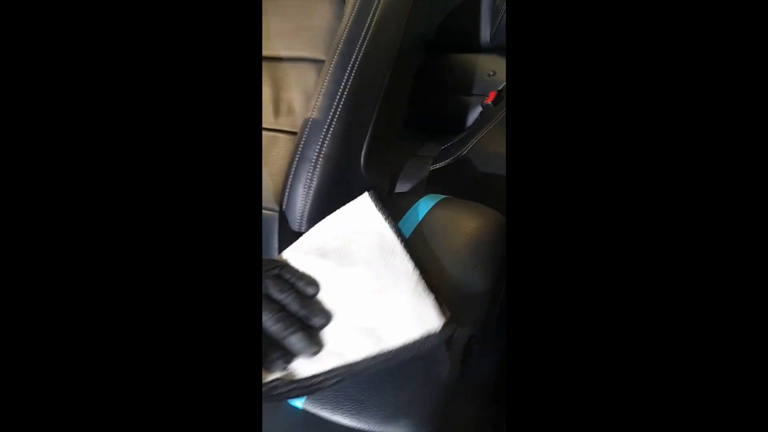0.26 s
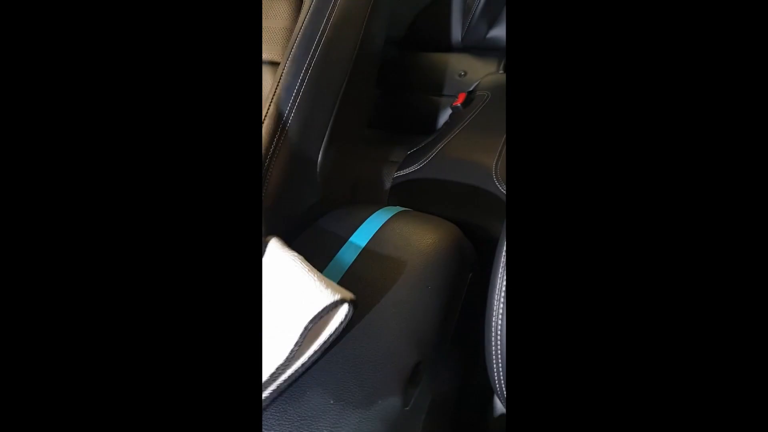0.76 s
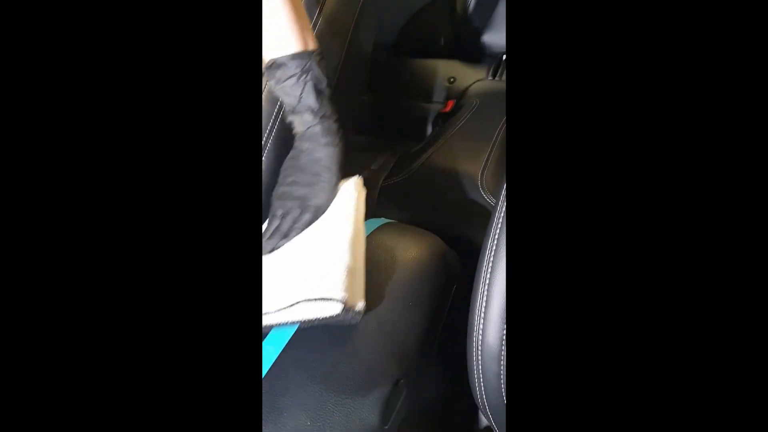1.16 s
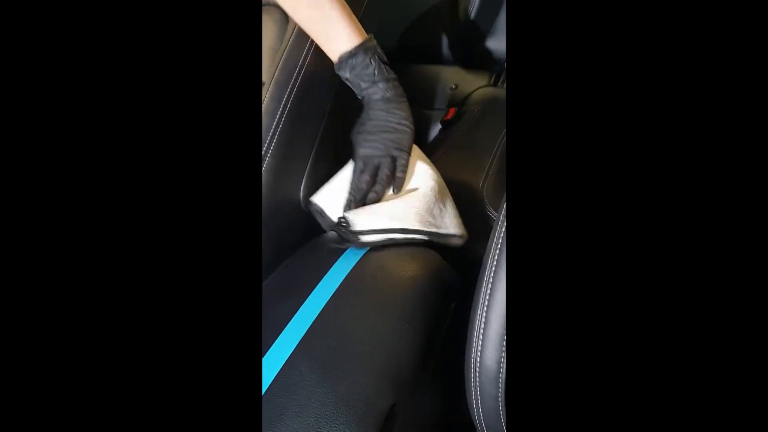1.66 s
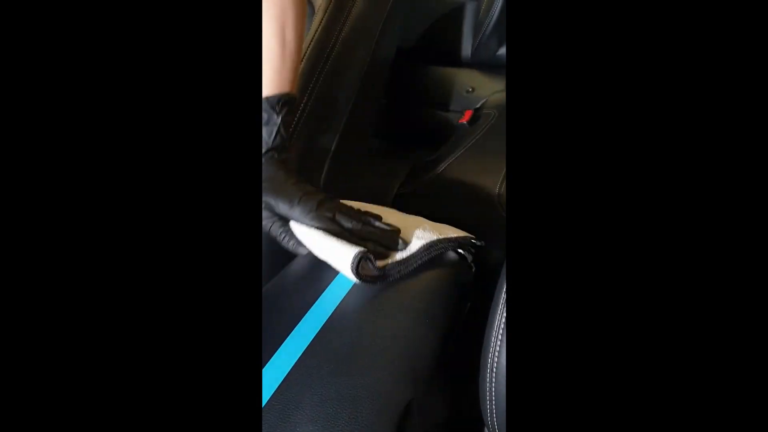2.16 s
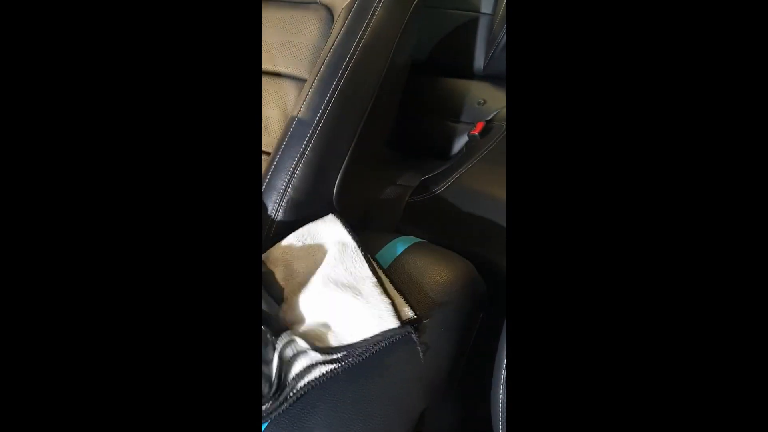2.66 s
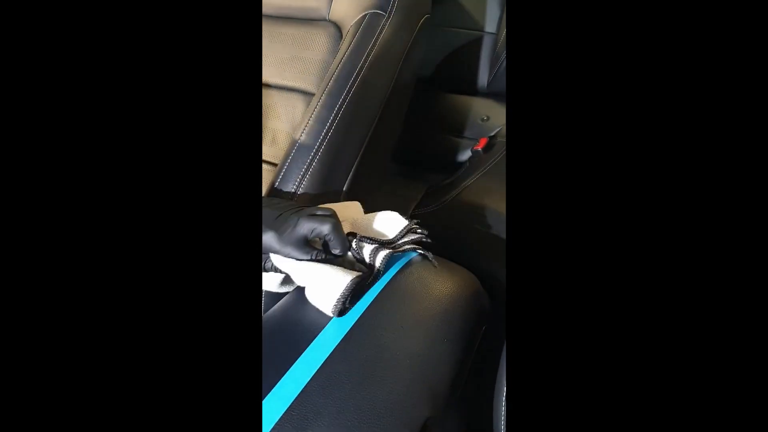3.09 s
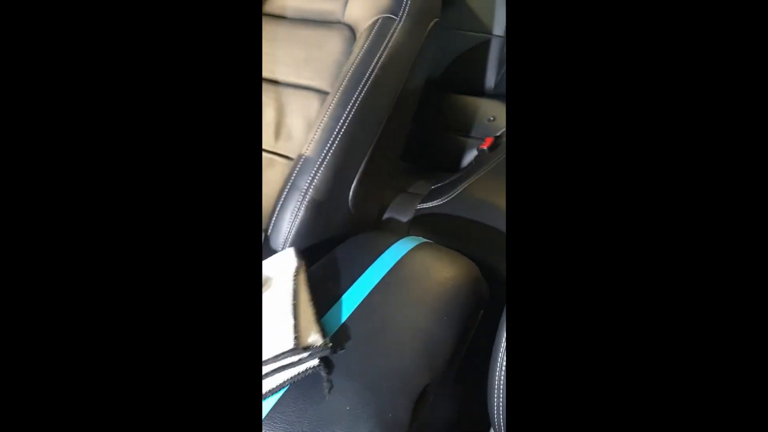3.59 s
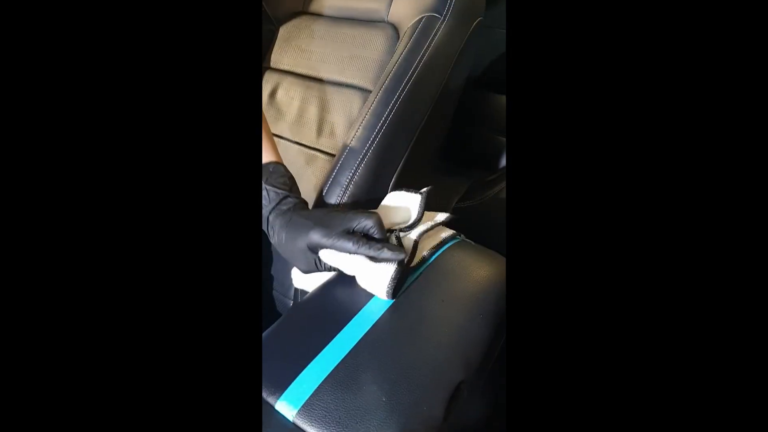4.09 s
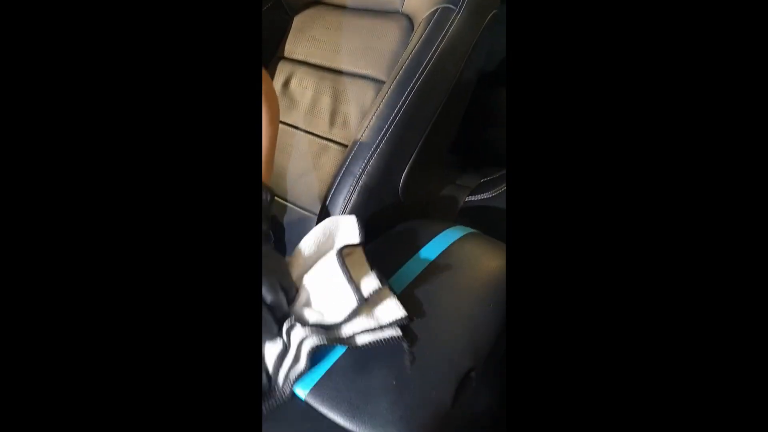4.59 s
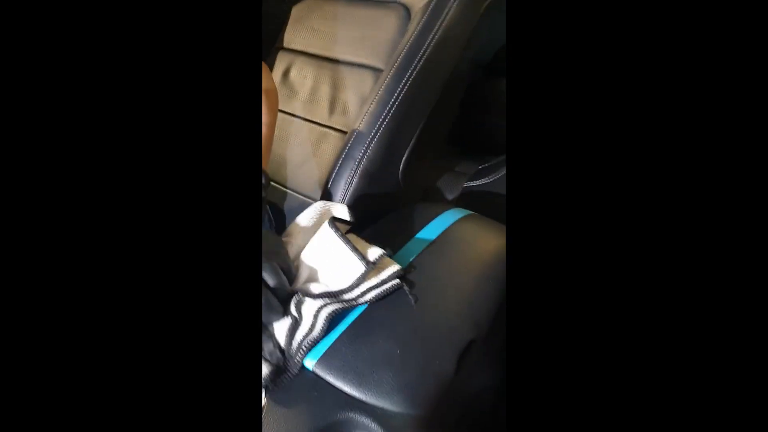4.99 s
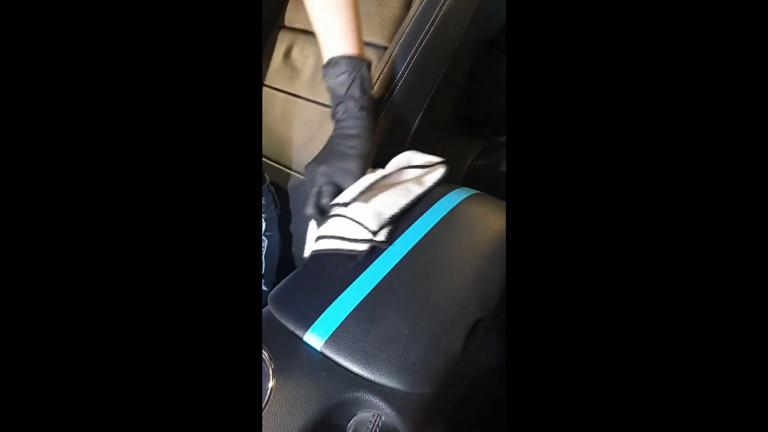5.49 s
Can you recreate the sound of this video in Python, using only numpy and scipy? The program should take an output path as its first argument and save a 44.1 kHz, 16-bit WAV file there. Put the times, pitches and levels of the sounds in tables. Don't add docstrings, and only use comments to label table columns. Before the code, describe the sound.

Sharp taps and heavy cushion thumps open, then a cloth hisses softly over a leather car seat, with one hard hollow knock midway.

```python
import sys
import numpy as np
from scipy import signal
from scipy.fft import rfft, irfft, next_fast_len
from scipy.io import wavfile
from scipy.ndimage import uniform_filter1d

SR = 44100
rng = np.random.default_rng(int(sys.argv[2]) if len(sys.argv) > 2 else 0)


def undo_db(level):
    steps = np.asarray(level, float) / 20
    return 10 ** steps


def materialize(psi):
    bounded = np.clip(np.atleast_2d(psi).T, -1, 1)
    quanta = np.round(bounded * 32767).astype(np.int16)
    wavfile.write(sys.argv[1], SR, quanta)


N = 253486
SIZE = next_fast_len(N)

# fastest moment in s, speeding up in s, slowing down in s,
# fibre hiss in dB, skin hum in dB.
SCUFFS = [(1.055, 0.038, 0.21, -69, -58), (1.887, 0.14, 0.092, -35.5, -73), (2.64, 0.073, 0.081, -54, -61),
          (3.235, 0.049, 0.072, -64, -68.5), (3.62, 0.29, 0.29, -61, -69.5),
          (3.915, 0.084, 0.17, -67, -51.5), (5.8, 0.18, 0.17, -80, -68), (4.41, 0.13, 0.29, -53, -53),
          (5.38, 0.3, 0.33, -82, -67.5), (5.62, 0.37, 0.22, -72, -67.5), (2.27, 0.056, 0.42, -70, -51),
          (2.19, 0.15, 0.11, -61.5, -84), (1.04, 0.22, 0.29, -59, -66)]
SCUFF_EASE = 1.115


def noise():
    return rng.standard_normal(N)


def unit(x):
    return x / np.sqrt(np.mean(x ** 2))


def peak(x):
    return x / np.max(np.abs(x))


def on_log_hz(table):
    hz, value = np.transpose(table)
    line_hz = np.fft.rfftfreq(SIZE, 1 / SR)
    return np.interp(np.log(line_hz + 1), np.log(hz), value)


def colour(x, gain):
    return irfft(rfft(x, SIZE) * gain, SIZE)[..., :N]


def resonate(x, bands):
    out = 0
    for hz, width_hz, db in bands:
        b, a = signal.iirpeak(hz, hz / (1.72 * width_hz), SR)
        once = signal.lfilter(b, a, x)
        out = out + undo_db(db) * signal.lfilter(b, a, once)
    return unit(out)


def ring(modes, t, detune):
    out = 0
    for (hz, db, t60_s), factor in zip(modes, detune):
        out = out + undo_db(db - 60 * t / t60_s) * np.sin(2 * np.pi * hz * factor * t)
    return out


def walk(rate_hz):
    hold = int(SR / rate_hz)
    steps = np.repeat(rng.standard_normal(N // hold + 1), hold)
    return 0.3 * uniform_filter1d(uniform_filter1d(steps, hold), hold)[:N]


def grains(per_s, spread_db):
    slips = rng.random(N) < per_s / SR
    return slips * noise() * undo_db(spread_db * rng.exponential(size=N))


def ports(make):
    # frequency in Hz, left-right likeness from 0 to 1.
    likeness = [(60, 0.96), (250, 0.68), (700, 0.35), (2000, 0), (4000, 0.05), (12000, 0)]
    alike = np.clip(on_log_hz(likeness), 0, 1)
    mid = colour(make(), np.sqrt(1 + alike))
    side = colour(make(), np.sqrt(1 - alike))
    return np.array([mid + side, mid - side]) / np.sqrt(2)


def sides(pan_db):
    return undo_db(np.array([pan_db, -pan_db]) / 2)


def curves(table, quiet_db=None):
    s, *columns = np.transpose(table)
    t = np.arange(N) / SR
    return [np.interp(t, s, c, left=quiet_db, right=quiet_db) for c in columns]


def add(out, s, sound):
    i = int(max(s, 0) * SR)
    out[:, i:i + sound.shape[-1]] += sound[..., :N - i]


def move_power(moves, ease):
    standstill_db = -33.5
    t = np.arange(0, N + 64, 64) / SR
    power = 0
    for s, rise_s, fall_s, *db in moves:
        away = np.where(t < s, (s - t) / rise_s, (t - s) / fall_s)
        slowing_db = np.maximum(standstill_db * away ** ease, -200)
        power = power + undo_db(np.array(db)[:, None] + slowing_db) ** 2
    return np.array([np.interp(np.arange(N) / SR, t, p) for p in power])


def cabin():
    # frequency in Hz, density in dB per Hz.
    air_spectrum = [(28, -8.5), (85, -7.5), (260, -29), (465, -32), (856, -31), (1700, -35.5), (2280, -34),
                    (4430, -45), (11200, -34), (16000, -37)]
    level = undo_db(-60 + 0.98 * walk(5.8))
    return level * ports(lambda: unit(colour(noise(), undo_db(on_log_hz(air_spectrum)))))


def cushion():
    # time in s, foam rumble in dB, leather creak in dB.
    load = [(0.0, -12.5, -58), (.14, -43, -53), (.26, -51, -60), (.3, -23, -60), (.59, -51, -68),
            (.85, -62.5, -81), (1.15, -61, -59.5), (1.75, -65.5, -73), (2.0, -54, -63), (2.58, -50, -60.5),
            (2.8, -52, -100), (2.93, -41, -43.5), (3.07, -52.5, -67), (3.39, -46, -40.5), (3.5, -46.5, -58),
            (4.23, -60, -67.5), (5.05, -48, -63), (5.75, -66, -60.5)]
    # time in s, groan in dB.
    squeeze = [
        (3.17, -73.5),
        (3.178, -71),
        (3.23, -46),
        (3.278, -48.5),
        (3.292, -38),
        (3.346, -36.5),
        (3.482, -81),
        (3.5, -54),
    ]
    # frequency in Hz, width in Hz, level in dB.
    foam_bands = [(55.3, 14.7, 3), (67.5, 31, 2), (108.5, 39.4, -6.5)]
    creak_bands = [(161.7, 64, 5.5), (269.4, 28, -1), (466, 103, -11.5)]
    groan_bands = [(383, 35, 1.5), (449, 13, -2), (750, 36, -9), (950, 54, -20)]
    rumble_db, creak_db = curves(load)
    groan_db = curves(squeeze, quiet_db=-120)[0]
    scuff_hum = np.sqrt(move_power(SCUFFS, SCUFF_EASE)[1])
    stretch = undo_db(creak_db) + undo_db(-6.5) * scuff_hum
    rumble = ports(lambda: resonate(noise(), foam_bands)) * undo_db(rumble_db + 0.5)
    creak = ports(lambda: resonate(grains(500, 2.4), creak_bands)) * undo_db(walk(25.2)) * stretch
    groan = ports(lambda: resonate(grains(2000, 1.7), groan_bands)) * undo_db(groan_db - 2.5)
    return rumble + creak + groan


def thumps():
    # start in s, peak in dB,
    # pitch in Hz, swell time in s.
    landings = [(0.0041, -22.5, 69.6, 0.0074), (0.0211, -7.5, 92, 0.002), (0.052, -9.5, 51.6, 0.0041),
                (0.031, -21.5, 134.5, 0.013), (0.2841, -13, 112, 0.0048), (0.307, -21, 59, 0.012),
                (0.333, -17, 111, 0.0051), (0.389, -19, 87, 0.0045), (0.425, -21, 66.6, 0.0045),
                (0.462, -28, 82, 0.0045), (2.905, -22, 113, 0.0071), (2.924, -25.5, 108, 0.0091)]
    pushes = [(1.071, -48, 47.7, 0.015), (1.619, -45.5, 71.2, 0.015), (1.916, -43.5, 68, 0.0082),
              (2.036, -42, 87.04, 0.004), (2.122, -31, 83.7, 0.012), (2.171, -32, 69.5, 0.0044),
              (2.278, -43, 140.4, 0.013), (2.329, -33.5, 46.7, 0.0072), (2.422, -33.5, 63, 0.0048),
              (2.512, -33.5, 108.5, 0.011), (2.586, -43, 105, 0.007), (2.734, -38, 90, 0.018),
              (3.049, -37.5, 110, 0.0091), (3.26, -35, 96.4, 0.013), (3.323, -35, 141.7, 0.017),
              (3.417, -30, 103, 0.0046), (3.441, -35, 54.4, 0.008), (3.57, -31, 52, 0.0063),
              (3.901, -45.5, 71.7, 0.026), (4.051, -48.5, 96, 0.019), (4.397, -47, 68.5, 0.021),
              (4.612, -31, 61.6, 0.0098), (4.839, -26, 91.3, 0.011), (4.862, -24, 60, 0.0077),
              (4.937, -35.5, 65.4, 0.0061), (5.054, -30.5, 71, 0.0082), (5.078, -29, 64.4, 0.01),
              (5.255, -40, 83.4, 0.012), (5.301, -36, 48.8, 0.003), (5.428, -40, 92.5, 0.011),
              (0.1, -28, 66.1, 0.029), (0.142, -24, 50, 0.0073), (0.199, -38, 45.2, 0.024),
              (0.519, -38, 52, 0.003), (0.571, -45, 55.3, 0.02), (0.699, -53, 66.7, 0.0089),
              (0.771, -47, 54.5, 0.019), (0.856, -43, 64.6, 0.0045), (1.139, -51, 55.5, 0.039),
              (1.342, -48.5, 55, 0.012), (1.681, -52, 61.5, 0.011), (1.745, -51.5, 64.7, 0.0079),
              (1.99, -48.5, 46.3, 0.012), (2.639, -49.5, 67.5, 0.0066), (2.688, -41, 53.3, 0.061),
              (2.968, -37, 145, 0.0058), (3.499, -53, 70, 0.0073), (3.599, -29.5, 64.22, 0.0036),
              (3.661, -66, 103.6, 0.039), (3.959, -43.5, 49, 0.011), (4.098, -51, 80.7, 0.0059),
              (4.248, -50.5, 107, 0.017), (4.459, -48, 65, 0.013), (4.686, -44, 53, 0.0057),
              (5.146, -46, 50, 0.0098), (5.599, -40, 43.3, 0.012)]
    left_lag_s = 0.00024
    out = np.zeros((2, N))
    t = np.maximum(np.arange(SR // 4) / SR - np.array([[left_lag_s], [0]]), 0)
    for s, db, hz, swell_s in landings + pushes:
        age = t / max(swell_s, 0.002)
        turns = hz * (t + 0.35 * swell_s * (1 - np.exp(-age)))
        foam = np.sin(2 * np.pi * turns)
        cover = undo_db(-9.5) * np.exp(-0.6 * age) * np.sin(2 * np.pi * 1.764 * turns)
        swell = age * np.exp(1 - age)
        add(out, s, undo_db(db) * swell * (foam + cover) * sides(0.74)[:, None])
    return out


def ticks():
    # start in s, peak in dB.
    seam_slips = [
        (4.121, -50),
        (4.14, -47),
        (4.171, -43),
        (4.2, -45.5),
        (4.2415, -46),
        (0.422, -52),
        (3.2905, -48.5),
    ]
    out = np.zeros((2, N))
    t = np.arange(SR // 50) / SR
    click = peak(ring([(1400, 0, 0.0025)], t, [1]))
    for s, db in seam_slips:
        add(out, s, -undo_db(db) * click * sides(2.0)[:, None])
    return out


def taps():
    # start in s, peak in dB, crack in dB, body in dB, ring in Hz.
    hard_taps = [
        (0.0, -18, -12.5, -0.5, 1080),
        (0.0162, -10, -13.5, -11, 1093),
        (0.0234, -14, -19, -7.5, 1080),
        (0.042, -34.5, -0.5, 3, 990),
    ]
    # start in s, peak in dB, body in dB, ring in Hz, contact in s.
    snags = [(0.052, -39, -13, 1040, 0.0022), (1.926, -62, 15, 1190, 0.003), (2.063, -60.5, -3, 800, 0.003),
             (2.119, -54.5, 10, 1040, 0.0066), (2.167, -66, 20, 778, 0.00382),
             (2.372, -46, -4.5, 902, 0.0027), (2.526, -49, -5, 711, 0.004), (3.052, -51, 8.5, 888, 0.0044),
             (3.227, -42.5, 6, 810, 0.0018), (3.289, -42, 2, 724, 0.0039), (3.338, -33.5, -16, 720, 0.0054),
             (3.416, -41, -5, 740, 0.0019), (3.524, -37, -11, 945, 0.0045), (4.797, -69, 12, 900, 0.003),
             (4.829, -43, -6, 680, 0.014), (5.008, -66.5, 22, 663, 0.0033),
             (5.429, -48, -16.5, 784, 0.0035)]
    # multiple of the ring pitch, level in dB, t60 in s.
    panel_modes = [(.8, -11, 0.042), (1, 4, 0.047), (1.35, 1, 0.0119), (1.95, -0.5, 0.0034)]
    body_modes = [(227.5, 0.006, 0.055), (289.4, 0.00044, 0.1097)]  # Hz, dB, t60 s
    tap_contact_s, snag_crack_db = 0.0043, -30
    contacts = [(*tap, tap_contact_s) for tap in hard_taps]
    contacts += [(s, db, snag_crack_db, *rest) for s, db, *rest in snags]

    out = np.zeros((2, N))
    t = np.arange(SR // 10) / SR
    crack_band = signal.butter(1, 3500, "high", fs=SR, output="sos")
    rasp_band = signal.butter(1, [1300, 3600], "band", fs=SR, output="sos")
    for s, db, crack_db, body_db, hz, contact_s in contacts:
        scratch = rng.standard_normal((3, len(t))) * np.exp(-t / max(contact_s, 0.0005))
        scratch[0, 0] = 9.2
        shared, apart = scratch[0], scratch[1:]
        panel_ring = ring(panel_modes, t, np.full(len(panel_modes), hz))
        panel = signal.fftconvolve(shared + 0.78 * apart, panel_ring[None])[:, :len(t)]
        crack = peak(signal.sosfilt(crack_band, 0.18 * shared + apart)) * sides(-0.55)[:, None]
        tail = undo_db(-7.5) * np.exp(-t / 0.0092) * rng.standard_normal((2, len(t)))
        rasp = peak(signal.sosfilt(rasp_band, apart + tail)) * sides(1.4)[:, None]
        body = ring(body_modes, t, 1 + 0.058 * rng.standard_normal(2))
        scrape = undo_db(crack_db + 11.0) * (crack + undo_db(-1.0) * rasp)
        add(out, s, undo_db(db) * (peak(panel) + scrape - undo_db(body_db) * peak(body)))
    return out


def knocks():
    # start in s, peak in dB, left minus right in dB.
    blows = [
        (2.883, -8.5, 2.5),
        (2.901, -16.5, 4),
    ]
    # frequency in Hz, level in dB, t60 in s.
    trim_modes = [(224, -2.5, 0.15), (304.7, 6.5, 0.1), (509, -9.5, 0.064), (888, -1.5, 0.065),
                  (984, 4.5, 0.019), (1190, -17, 0.039), (1390, -2, 0.015), (1684, -7.5, 0.033),
                  (2037, -23, 0.11), (2790, -18, 0.068)]
    right_lag_s = 0.00012
    out = np.zeros((2, N))
    t = np.maximum(np.arange(SR // 5) / SR - np.array([[0], [right_lag_s]]), 0)
    dull_band = signal.butter(1, [900, 4000], "band", fs=SR, output="sos")
    for s, db, pan_db in blows:
        spread = np.exp(-t / 0.0054) + undo_db(-18.5) * np.exp(-t / 0.13)
        crack = signal.sosfilt(dull_band, rng.standard_normal(t.shape)) * spread
        detune = 1 + 0.0093 * rng.standard_normal(len(trim_modes))
        blow = -peak(ring(trim_modes, t, detune)) * (1 - np.exp(-t / 0.00017))
        snap = undo_db(-30) * rng.standard_normal(t.shape) * np.exp(-t / 0.00076)
        knock = blow + undo_db(-17.0) * peak(crack) + snap
        add(out, s, undo_db(db) * knock * sides(pan_db)[:, None])
    return out


def bounces():
    # start in s, peak in dB, crack in dB, body in dB, left minus right in dB.
    landings = [
        (0.2843, -24, 0, -16, -1),
        (0.3308, -25, -3, -21, 0),
        (0.3834, -28.5, -6.5, -6, -0.5),
        (0.4195, -39, -16, 4, -1.5),
    ]
    # frequency in Hz, level in dB, t60 in s.
    plate_modes = [(797, 1.5, 0.032), (961, -0.5, 0.049), (1113, 1, 0.033), (1470, -7, .03),
                   (2010, -4, 0.032), (2360, -7.5, 0.029), (2860, -8.5, .025), (3330, -8, 0.024),
                   (4790, -5.5, 0.016)]
    out = np.zeros((2, N))
    t = np.arange(SR // 10) / SR
    crack_band = signal.butter(1, 1800, "high", fs=SR, output="sos")
    body = ring([(228, 0.1, 0.05), (297, 0.12, 0.078)], t, [1, 1])
    for s, db, crack_db, body_db, pan_db in landings:
        detune = 1 + 0.032 * rng.standard_normal((len(plate_modes), 2, 1))
        plate = ring(plate_modes, t, detune) * (1 - np.exp(-t / 0.0024))
        decay = np.exp(-t / 0.004) + undo_db(-16) * np.exp(-t / 0.028)
        crack = signal.sosfilt(crack_band, rng.standard_normal((2, len(t))) * decay)
        hit = peak(plate) + undo_db(crack_db) * peak(crack) - undo_db(body_db) * peak(body)
        add(out, s, undo_db(db) * hit * sides(pan_db)[:, None])
    return out


def drags():
    # loudest moment in s, speeding up in s, slowing down in s, level in dB, pitch in Hz.
    skin_drags = [(1.06, 0.026, .1, -59.5, 940), (1.16, .08, 0.064, -60.5, 1020),
                  (1.1, 0.087, 0.14, -62.5, 525), (1.7, .05, 0.037, -68.5, 243), (1.86, .04, .05, -61, 250),
                  (2.06, .03, 0.026, -65.5, 444), (3.06, .06, 0.057, -63, 870),
                  (3.062, 0.025, 0.038, -50.5, 354), (3.35, .06, .1, -57, 660),
                  (3.419, .008, 0.0098, -45, 710), (3.47, 0.092, 0.16, -59.5, 520),
                  (3.48, 0.043, 0.061, -64, 1400), (3.9, 0.017, 0.016, -46, 1050),
                  (3.8, 0.014, 0.018, -50, 2070), (3.94, 0.03, 0.064, -62.5, 1700),
                  (4.1, 0.041, 0.1, -64, 920), (4.26, 0.11, 0.17, -60, 1640),
                  (4.26, 0.055, 0.15, -66.5, 2340), (4.38, .1, 0.069, -69, 2460),
                  (4.41, 0.054, .06, -62, 1300), (5.2, .05, .06, -65, 207), (5.3, 0.041, 0.053, -65.5, 390),
                  (5.36, 0.026, .03, -69, 1750), (5.37, 0.035, 0.044, -70, 1100),
                  (5.395, 0.0048, 0.0075, -52, 810), (5.395, .004, 0.012, -57, 1400),
                  (5.57, .07, .05, -64.5, 1850), (5.64, 0.061, 0.086, -64.5, 1900),
                  (5.54, .05, .05, -70, 970), (5.61, 0.054, 0.073, -64, 515), (5.6, 0.032, 0.077, -64, 810),
                  (5.64, 0.036, 0.056, -54, 177), (5.72, .03, .03, -69, 810), (0.79, 0.11, .08, -75, 590),
                  (2.14, 0.023, 0.06, -69.5, 1010), (4.45, 0.066, 0.07, -58, 230),
                  (3.88, 0.092, 0.12, -61.5, 1630), (3.87, 0.084, 0.14, -62, 2530),
                  (4.797, 0.0071, 0.013, -58, 280), (3.75, 0.1, 0.073, -62, 1070)]
    plate_buzzes = [
        (.305, .015, .03, -52, 890),
        (.35, .015, 0.025, -57, 950),
        (.4, 0.011, 0.015, -63, 950),
        (.445, .03, .05, -61, 940),
    ]
    out = np.zeros((2, N))
    t = np.arange(-SR // 8, SR // 5) / SR
    for s, rise_s, fall_s, db, hz in skin_drags + plate_buzzes:
        size = undo_db(0.83 * rng.exponential(size=len(t)))
        caught = rng.random(len(t)) < 0.08
        catches = rng.standard_normal((3, len(t))) * size * caught
        patch = resonate(catches[0] + 0.7 * catches[1:], [(hz, 0.15 * hz, 0)])
        away = np.where(t < 0, -t / rise_s, t / fall_s)
        level = undo_db(db - np.minimum(18 * away ** 2, 200))
        add(out, s + t[0], patch * level * sides(1)[:, None])
    return out


def cloth():
    # fastest moment in s, speeding up in s, slowing down in s,
    # fibre hiss in dB, skin hum in dB.
    wipes = [(0.1, 0.067, 0.051, -51.5, -58), (0.251, 0.2, 0.063, -45, -62.5), (0.36, 0.16, 0.29, -62, -60),
             (0.801, 0.22, 0.4, -53, -62.5), (1.36, 0.33, 0.23, -55, -62), (1.58, 0.11, 0.11, -59, -82.5),
             (1.93, .2, 0.24, -62.5, -75), (2.31, 0.15, 0.14, -49.5, -55), (2.46, 0.25, 0.35, -54.5, -57),
             (2.7, 0.16, 0.26, -62.5, -70.5), (2.92, 0.16, 0.3, -53.5, -61), (3.41, 0.19, 0.21, -48, -52),
             (3.881, 0.24, 0.18, -52.5, -59), (4.12, 0.083, 0.058, -59.5, -66.5),
             (4.29, 0.2, 0.18, -75, -61.5), (4.42, 0.26, 0.23, -55, -58), (4.7, 0.1, 0.16, -56, -67),
             (4.94, 0.091, 0.12, -50.5, -62), (5.13, 0.078, 0.18, -52.5, -73.5),
             (5.26, 0.17, 0.17, -52, -76), (5.64, 0.19, 0.56, -57.5, -74)]
    # time in s, left minus right in dB, slack skin over taut skin in dB.
    place = [(.2, -6.5, -1), (.8, -8, -10), (1.0, -13, -4), (1.12, -4.5, -2), (1.35, -6, -7.5),
             (1.88, 1.5, 5), (2.07, -10.5, -10.5), (2.28, -0.5, -10.5), (2.6, 0, -5.5), (3.0, -1, -3.5),
             (3.9, 0, -1.5), (4.28, 3, -5), (4.41, -1, 1), (4.53, 0, -6), (4.95, 1, -8), (5.38, -1.5, 2.5),
             (5.55, 3, 2), (5.62, 0, 6)]
    # frequency in Hz, density in dB per Hz.
    fibre_spectrum = [(1200, -13.5), (2500, -7.5), (3700, -7), (4700, -2), (6800, -2.5), (9000, -1.5),
                      (11100, 2), (13000, -1), (15000, -1), (16500, -4.5)]
    # frequency in Hz, width in Hz, level in dB.
    slack_bands = [(524, 49, -1.5), (820, 350, 0), (966, 160, -1)]
    taut_bands = [(1687, 460, 8), (2087, 350, 0.5), (2413, 440, 0), (2680, 1200, -2.5)]
    power = move_power(wipes, 2.87) + move_power(SCUFFS, SCUFF_EASE)
    hiss_gain, hum_gain = np.sqrt(power)
    pan_db, slack_db = curves(place)
    hiss = ports(lambda: unit(colour(grains(16000, 0.41), undo_db(on_log_hz(fibre_spectrum)))))
    slack = ports(lambda: resonate(grains(5000, 0.95), slack_bands)) * undo_db(slack_db)
    taut = ports(lambda: resonate(grains(5000, 0.3), taut_bands)) * undo_db(-0.5)
    flutter = undo_db(0.7 * walk(30))
    fibres = hiss * hiss_gain * flutter * sides(pan_db)
    skin = (slack + taut) * hum_gain * flutter * sides(3.9)[:, None]
    return fibres + skin


def scene():
    background = cabin() + cushion() + thumps()
    contacts = ticks() + taps() + knocks() + bounces()
    return background + contacts + drags() + cloth()


def band_limit(x):
    return signal.sosfilt(signal.butter(12, 16610, fs=SR, output="sos"), x)


def record(dry):
    # frequency in Hz, left minus right in dB.
    port_tone = [(100, 1), (300, -0.5), (1000, 0), (3000, 1), (7000, 3), (13000, -3)]
    low_cut = signal.butter(6, 38, "high", fs=SR, output="sos")
    top_cut = signal.ellip(8, 0.3, 40, 15870, fs=SR, output="sos")
    heard = colour(dry, sides(on_log_hz(port_tone)))
    heard = signal.sosfilt(low_cut, heard)
    heard = signal.sosfilt(top_cut, heard)
    return band_limit(heard)


dry = scene()
out = record(dry)
materialize(out)
```